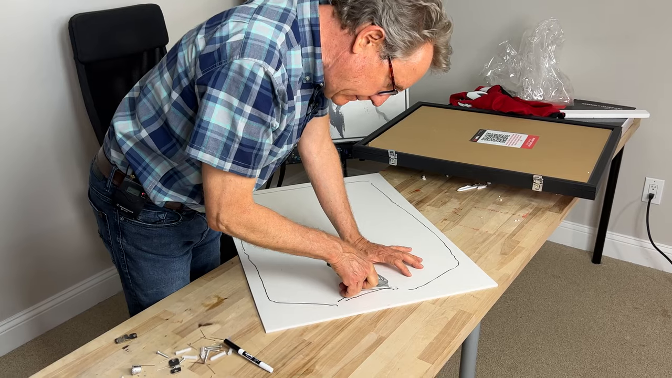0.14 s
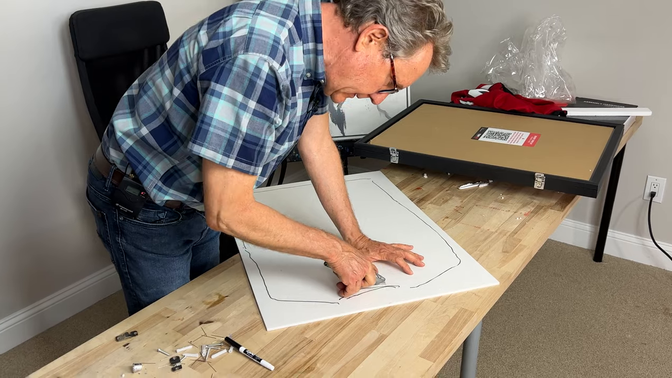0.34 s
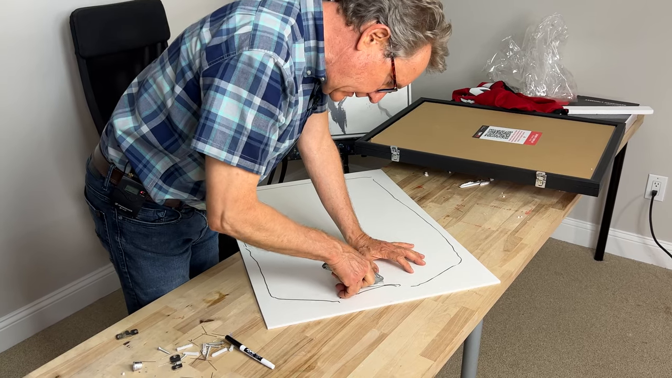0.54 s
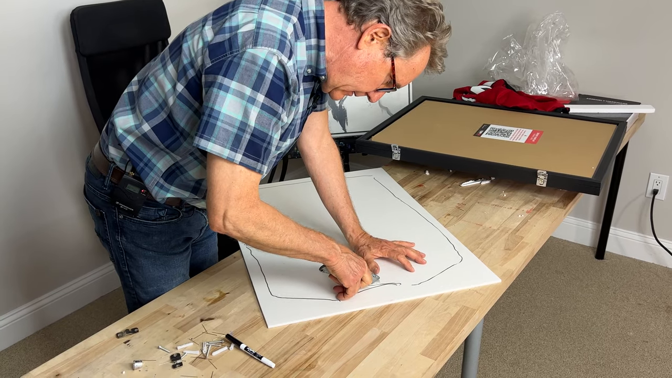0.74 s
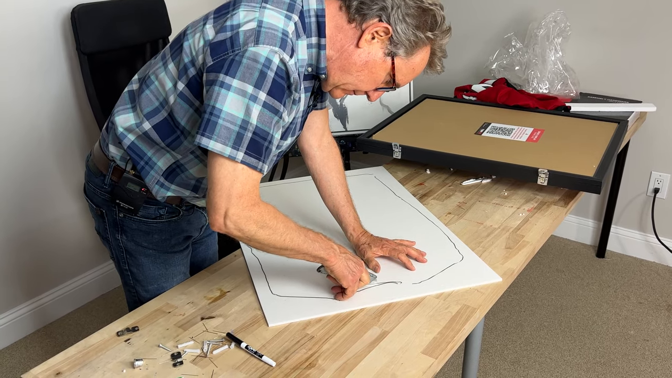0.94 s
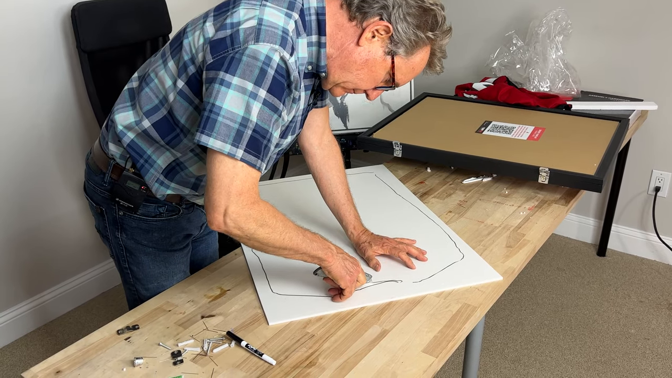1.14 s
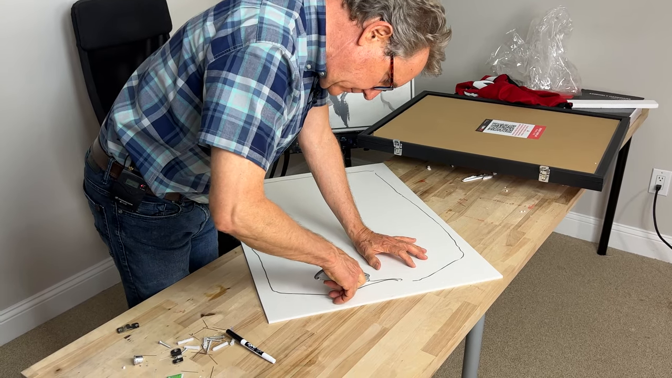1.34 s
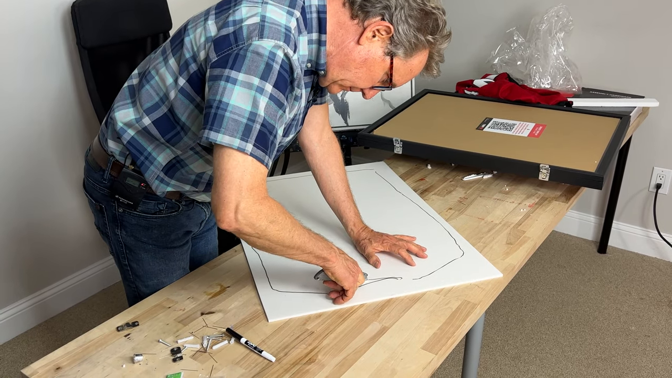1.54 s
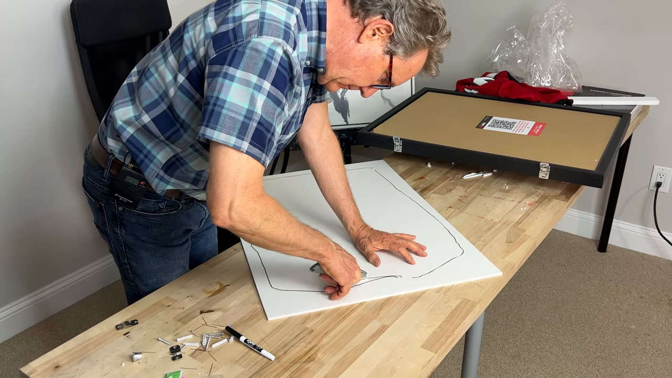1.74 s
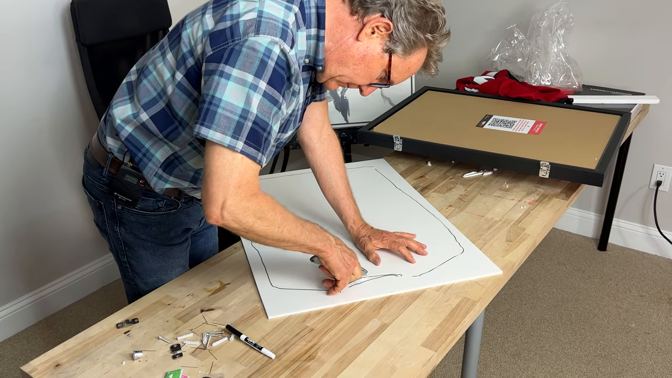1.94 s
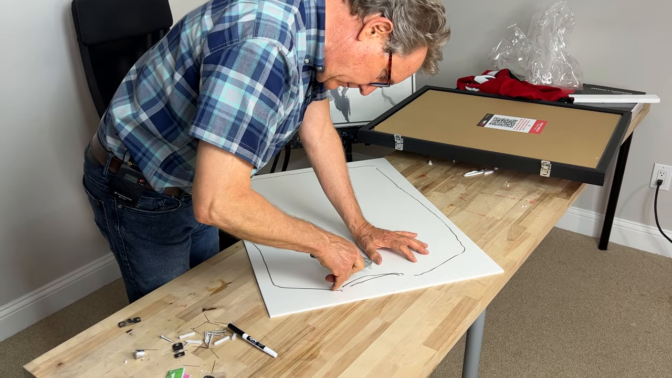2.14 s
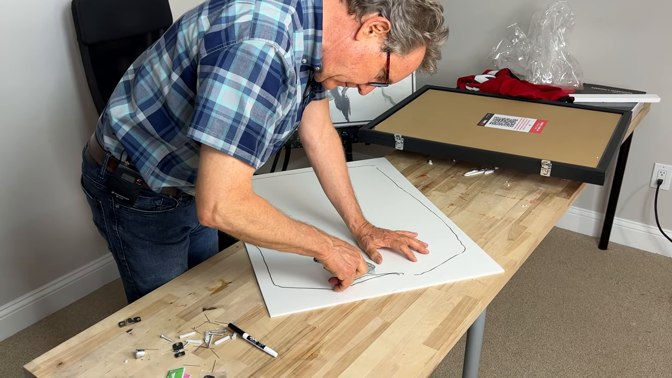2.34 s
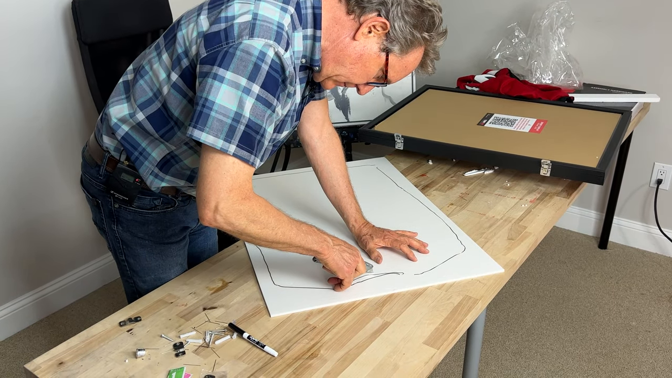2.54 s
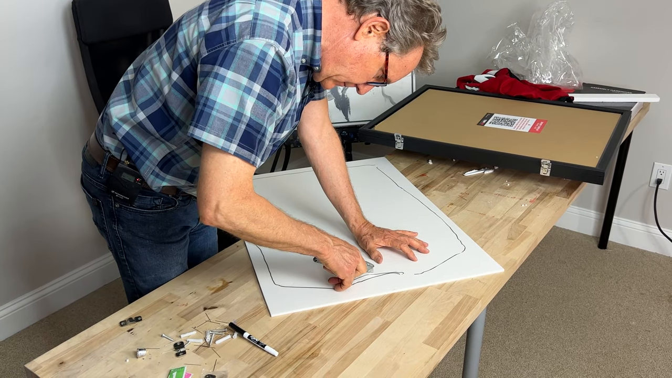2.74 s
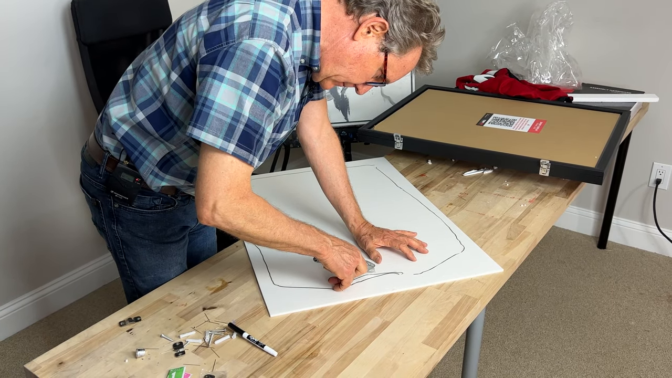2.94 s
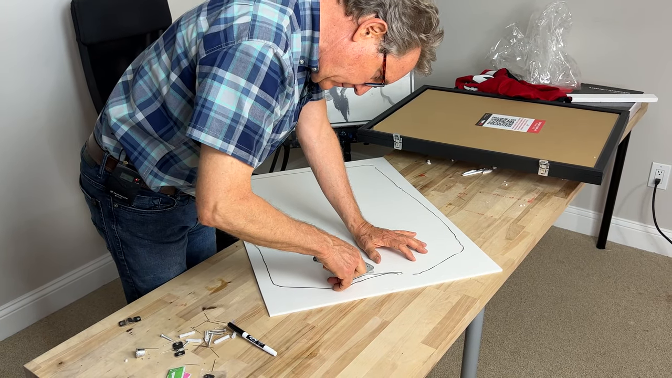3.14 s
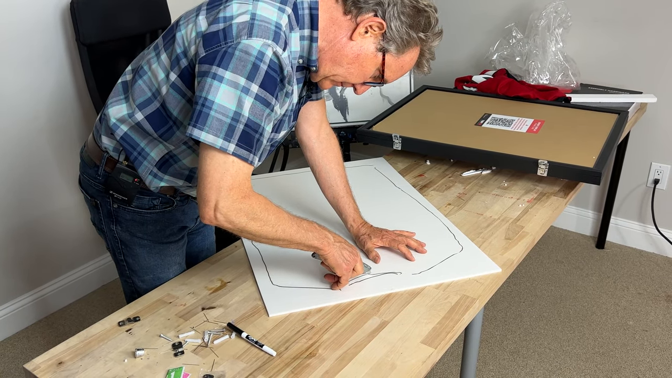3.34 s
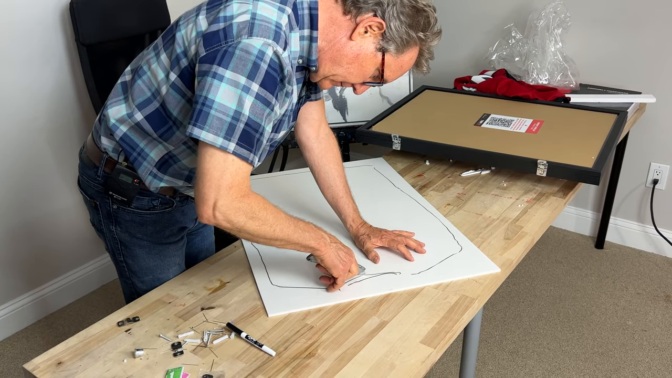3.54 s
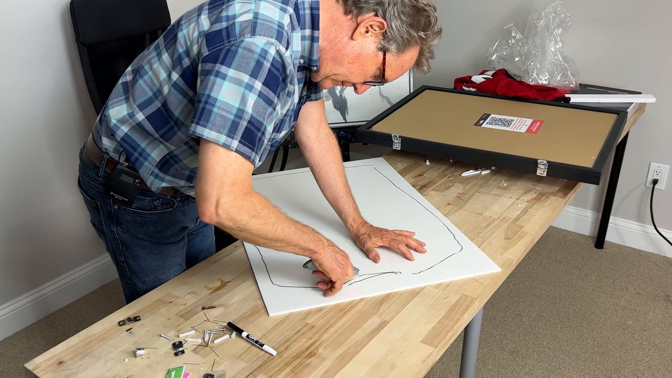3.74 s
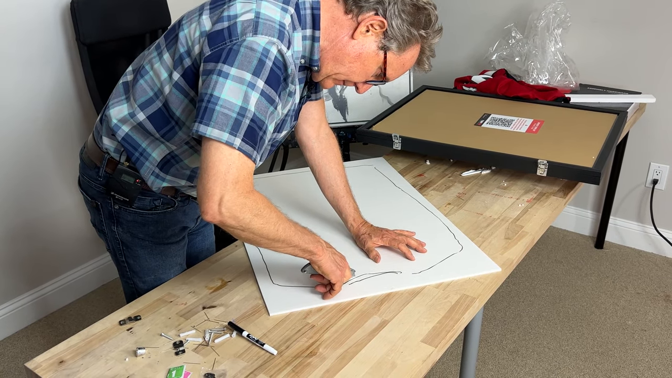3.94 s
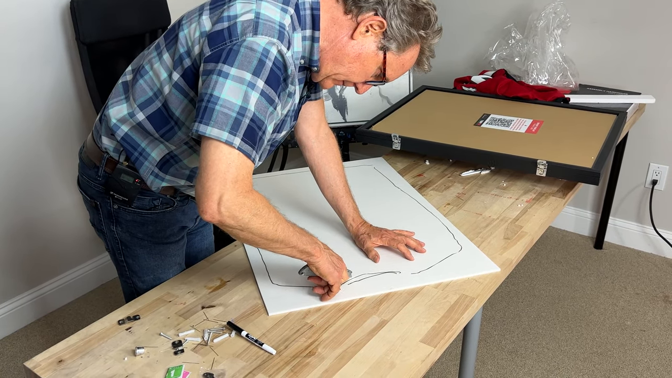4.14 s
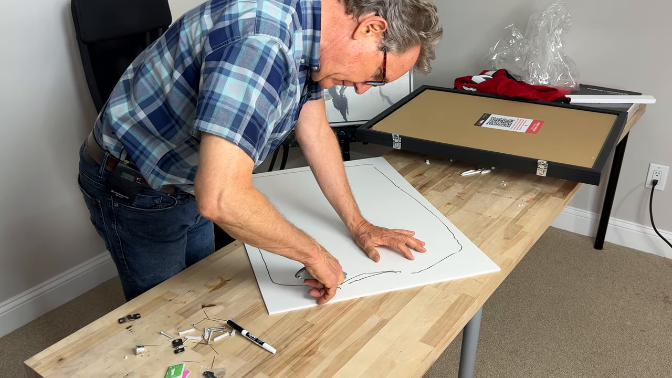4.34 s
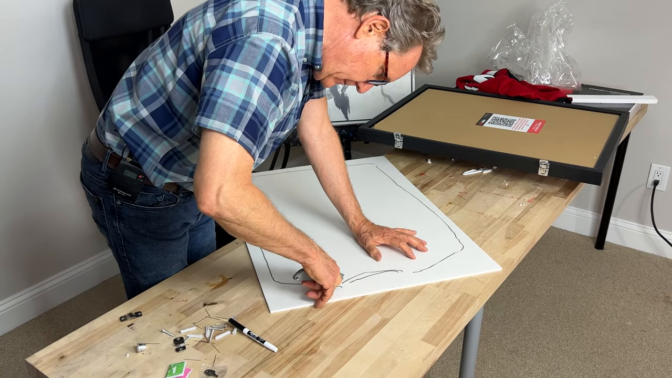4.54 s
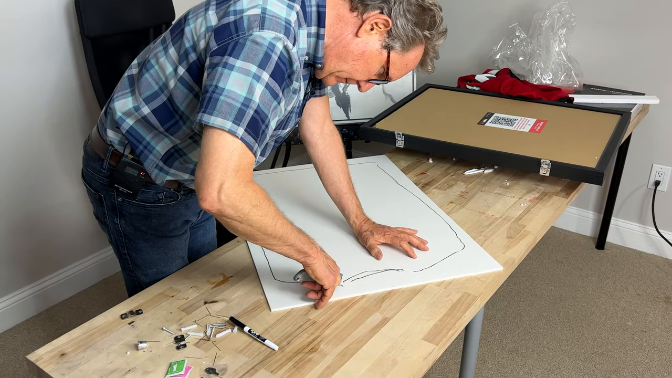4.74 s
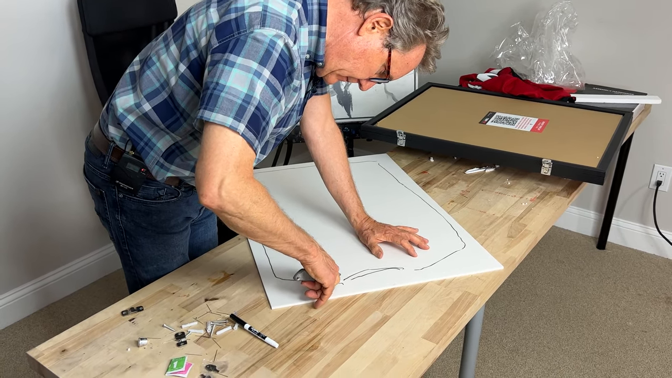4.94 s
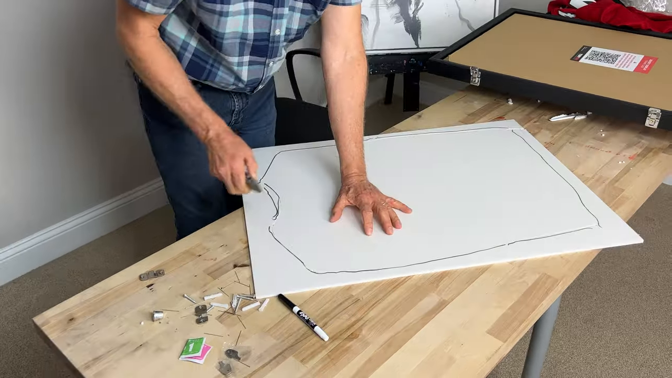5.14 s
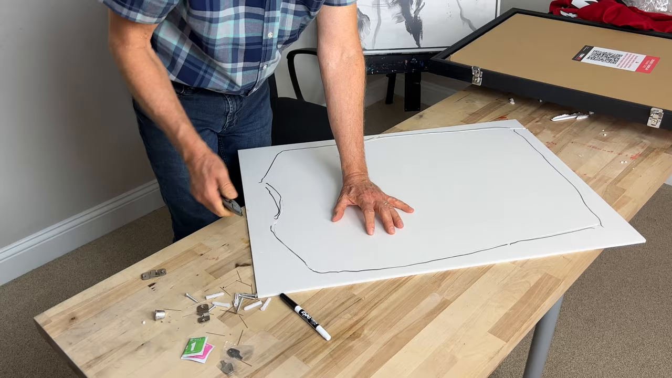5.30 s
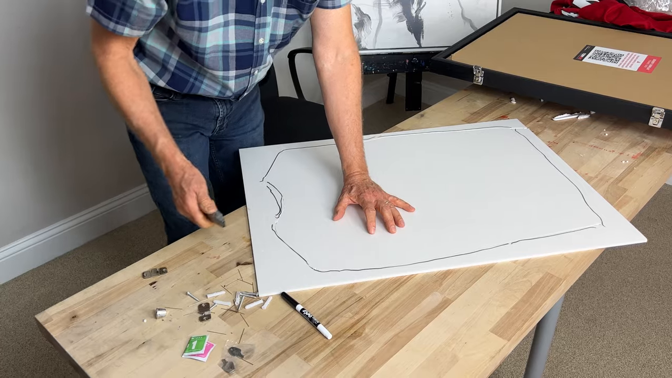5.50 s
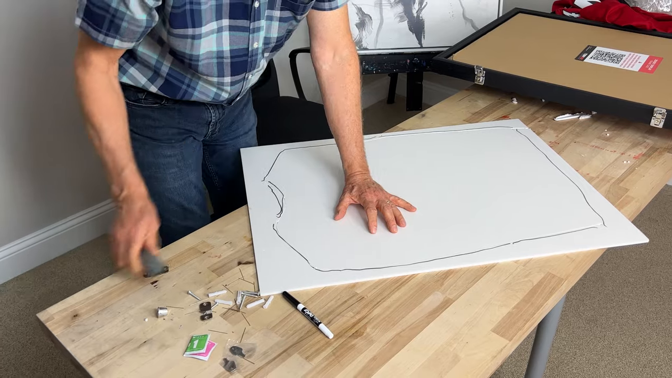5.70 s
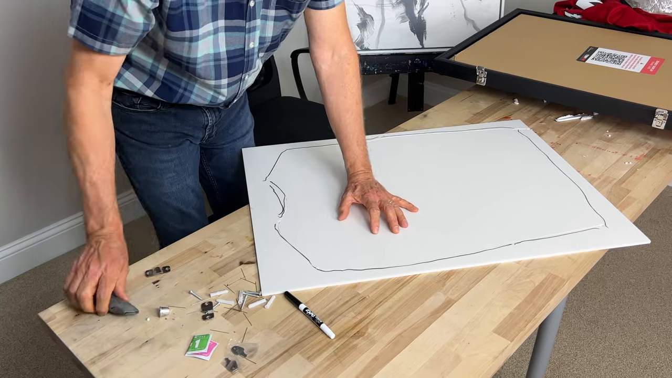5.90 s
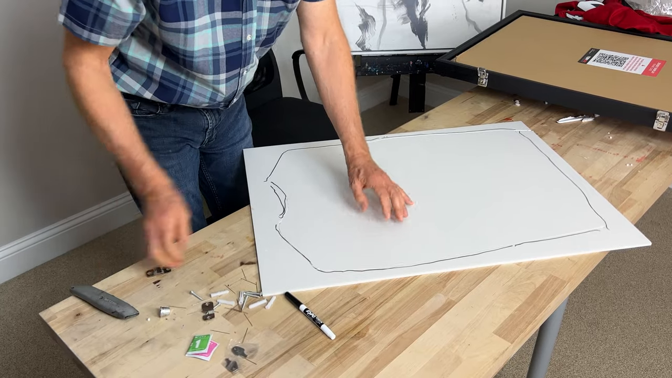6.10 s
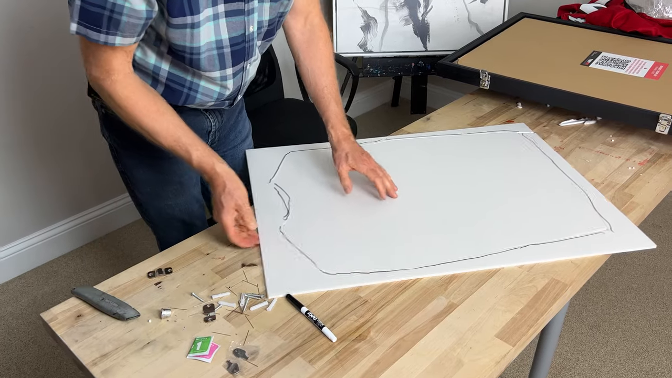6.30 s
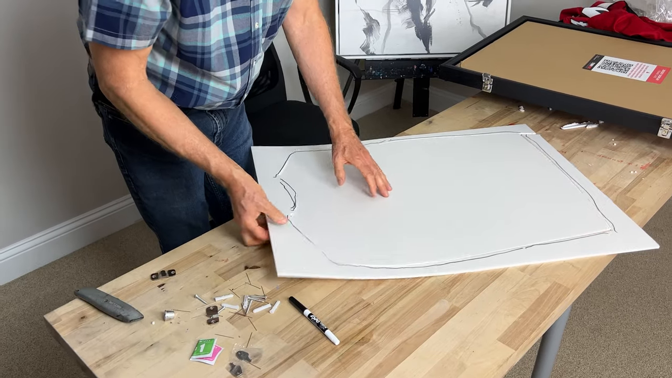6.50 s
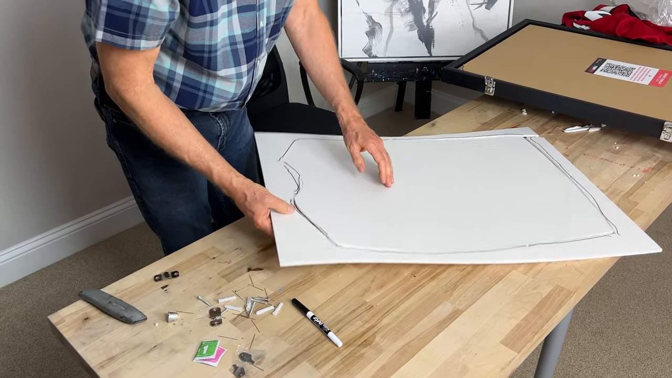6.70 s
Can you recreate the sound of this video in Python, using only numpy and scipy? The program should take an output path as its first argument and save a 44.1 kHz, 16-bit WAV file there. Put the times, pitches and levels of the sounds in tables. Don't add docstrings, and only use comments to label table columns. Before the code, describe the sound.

A utility knife hisses and drags through foam board in uneven strokes, then clatters onto a wooden bench before the board is lifted with scrapes.

```python
import sys
import numpy as np
from scipy import signal
from scipy.fft import rfft, irfft, next_fast_len
from scipy.io import wavfile
from scipy.ndimage import uniform_filter1d

SR = 44100
rng = np.random.default_rng(int(sys.argv[2]) if len(sys.argv) > 2 else 0)


def unload_wav(signal):
    wavfile.write(
        sys.argv[1],
        SR,
        np.round(np.clip(np.atleast_2d(signal).T, -1, 1) * 32767).astype(np.int16),
    )


def level_to_linear(level):
    exponent = np.asarray(level, float) / 20
    return 10 ** exponent


N = 302526

# freq_hz, level_db
BOARD_SPECTRUM = [(35, -24), (60, -25.5), (135, -3), (380, 0), (755, -4.5), (818, -4.5), (887, -12),
                  (1500, -20.5), (1950, -75), (3300, -120)]


def rms_one(x):
    return x / np.sqrt(np.mean(x ** 2) + 1e-20)


def add(out, at_s, x):
    i = round(at_s * SR)
    out[i:i + len(x)] += x[:N - i]


def in_time(rows):
    s, *columns = np.transpose(rows)
    t = np.arange(N) / SR
    is_open = 1. * ((t >= s[0]) & (t <= s[-1]))
    gate = uniform_filter1d(is_open, size=200, mode="nearest")
    return gate, [np.interp(t, s, c) for c in columns]


def coloured(x, spectrum):
    size = next_fast_len(N)
    hz = np.maximum(np.arange(size // 2 + 1) * SR / size, 1)
    points_hz, points_db = np.transpose(spectrum)
    gain = level_to_linear(np.interp(np.log(hz), np.log(points_hz), points_db))
    return rms_one(irfft(rfft(x, size) * gain, size)[:N])


def drift(rate_hz, size=N):
    r = np.exp(-2 * np.pi * rate_hz * 40 / SR)
    noise = rng.standard_normal(N // 40 + 2002)
    slow = signal.lfilter([1], [1, -2 * r, r * r], noise)[2000:]
    return np.interp(np.arange(size) / 40, np.arange(len(slow)), rms_one(slow))


def grains(per_s, spread_db, size=N):
    heights = level_to_linear(spread_db * np.minimum(rng.exponential(1, size), 4))
    heights = heights * rng.choice([-1, 1], size)
    return rms_one(heights * (rng.random(size) < per_s / SR))


def resonance(x, hz, width_hz):
    r = np.exp(-np.pi * width_hz / SR)
    poles = [1, -2 * r * np.cos(2 * np.pi * hz / SR), r * r]
    return signal.lfilter([(1 - r * r) / 2, 0, (r * r - 1) / 2], poles, x)


def ring(x, modes):
    total = 0
    for k, (hz, db, t60_s) in enumerate(modes):
        width_hz = np.log(1000) / np.pi / t60_s
        total = total + (-1) ** k * level_to_linear(db) * resonance(x, hz, width_hz)
    return rms_one(total)


def wavering(x, peaks, widen, waver_db, rate_hz):
    total = 0
    for hz, width_hz, db in peaks:
        gain = level_to_linear(db + waver_db * drift(rate_hz, size=len(x)))
        total = total + gain * resonance(x, hz, widen * width_hz + 30)
    return rms_one(total)


def plate(x, spacing_hz, depth_db, rate_hz, count):
    size, out = next_fast_len(N), 0
    spectrum, hz = rfft(x, size), np.arange(size // 2 + 1) * SR / size
    weights = (0.8 + np.tanh([drift(rate_hz) for k in range(count)])) ** 2
    for weight in weights / np.sqrt((weights ** 2).sum(axis=0)):
        ripple = np.interp(hz / spacing_hz, np.arange(2000), rng.standard_normal(2000))
        response = np.exp((depth_db * np.log(10) / 20 + 3j) * ripple)
        out = out + weight * irfft(spectrum * response, size)[:N]
    return rms_one(out)


def puff(length_s, fall_s):
    t = np.arange(int((length_s + 8 * fall_s) * SR)) / SR
    return np.minimum(t / (0.059 * length_s), 1) * np.exp(-np.maximum(t - length_s, 0) / fall_s)


def contacts(events, fall_s, sharp, broad_db, knock_sharp=3.9):
    out = np.zeros(N)
    for s, db, hz, length_s, board_db, board_hz in events:
        shape = puff(length_s, fall_s)
        noise = grains(8000, 2.8, size=6000)[:len(shape)]
        broad = level_to_linear(broad_db) * rms_one(resonance(noise, 4000, 4500))
        bright = broad + rms_one(resonance(resonance(noise, hz, hz / sharp), hz, hz))
        push = np.pad(shape * noise, (0, 900))
        knock = resonance(push, board_hz, board_hz / knock_sharp)
        knock += 0.55 * resonance(push, 0.34 * board_hz, board_hz / 2.0)
        add(out, s, level_to_linear(db - 17.5) * shape * bright)
        add(out, s, level_to_linear(db + board_db) * knock / np.abs(knock).max())
    return out


def pushes(rows, rounding):
    edge_db = 12
    t, hiss, board = np.linspace(0, N / SR, N // 20), 0, 0
    for s, rise_s, fall_s, db, bite_db in rows:
        away = np.where(t < s, (s - t) / rise_s, (t - s) / fall_s)
        power = level_to_linear(db - edge_db * np.minimum(away, 8) ** rounding) ** 2
        hiss, board = hiss + power, board + power * level_to_linear(bite_db) ** 2
    return np.array([np.interp(np.arange(N) / SR, t, power) for power in (hiss, board)])


def hand_gains():
    # peak_s, rise_s, fall_s, hiss_db, bite_db
    first_cut = [(0.02, 0.07, 0.067, -47, 2.5), (.15, 0.067, 0.14, -49, 0), (.29, 0.038, 0.16, -49.5, 3.5),
                 (.41, 0.027, 0.074, -53.5, 8.5), (.47, 0.037, 0.076, -53, 4.5),
                 (.555, 0.016, 0.095, -64.5, 11), (.61, 0.24, 0.26, -57.5, -18),
                 (.73, 0.058, 0.11, -47.5, -0.5), (.84, 0.12, 0.26, -53, 0),
                 (1.005, 0.053, 0.13, -50.5, 2.5), (1.09, 0.06, 0.23, -54, 4.5),
                 (1.33, 0.23, 0.069, -56, -2.5), (1.5, 0.13, 0.097, -54.5, -3),
                 (1.72, 0.11, 0.053, -58, -6), (1.87, 0.31, 0.12, -56, -37)]
    second_cut = [(3.4, 0.057, 0.05, -59, -13), (3.48, 0.092, 0.067, -55, 2), (3.65, .12, 0.16, -48.5, 5),
                  (3.9, 0.16, 0.15, -51.5, 1), (4.1, 0.066, 0.27, -58, -3), (4.33, 0.25, 0.24, -50, -2),
                  (4.56, 0.042, 0.095, -55, -3.5), (4.68, 0.046, 0.043, -62, 0),
                  (4.842, 0.13, 0.14, -52, -4.5), (5.11, 0.09, 0.27, -51.5, -9)]
    # peak_s, rise_s, fall_s, hiss_db
    skims = [(1.975, 0.021, 0.065, -59), (2.076, 0.027, 0.065, -48.5), (2.565, 0.0034, 0.11, -71),
             (2.85, 0.012, 0.016, -59.5), (2.9, 0.027, 0.02, -68), (3.165, 0.01, 0.026, -64),
             (3.25, 0.024, .03, -62), (3.208, 0.0099, 0.011, -45), (3.3, 0.11, 0.026, -59)]
    # from_s, to_s
    halts = [
        (1.58, 1.652),
        (1.938, 1.966),
        (4.932, 5.012),
    ]
    skim_bite_db, halt_db, cut_ends_s = -14, -12, 5.146
    power = pushes(first_cut + second_cut, 1.92)
    power = power + pushes([(*row, skim_bite_db) for row in skims], 1.2)
    t = np.arange(N) / SR
    halted = uniform_filter1d(1. * sum((t > start) & (t < end) for start, end in halts), size=600)
    return np.sqrt(power) * level_to_linear(halt_db * halted) * (t < cut_ends_s)


def cutting():
    # freq_hz, level_db
    hiss_spectrum = [(530, -32), (900, -10), (1510, -12.5), (1900, -8), (2660, -13.5), (2860, -9.5),
                     (4310, -7.5), (9650, -3.5), (13800, -9.5), (16000, -9.5)]
    stretch_starts = [0, .65, 1.62, 3.3, 3.56, 4.08, 4.98, 5.2]
    # freq_hz, width_hz, level_db
    blade_peaks = [
        [(1360, 51, -4), (1960, 62, 7), (2950, 170, 11), (4050, 72, 10), (6170, 230, 9.5), (6500, 200, 9.5),
         (9500, 140, 1), (11000, 200, -1)],
        [(1960, 68, -1), (3140, 320, 16), (2310, 200, -5), (5680, 230, 5), (6500, 320, 15), (8050, 310, 15.5),
         (9900, 78, 3), (11300, 120, 11), (13100, 140, -6)],
        [(3600, 150, 0.5), (2000, 150, -7), (5750, 320, -4), (6300, 77, -11), (8300, 270, 1)],
        [(4000, 150, 2), (5440, 300, -1), (8200, 290, -4), (9900, 430, 7)],
        [(1300, 180, -5), (1830, 53, 10), (4000, 44, -9), (5100, 120, 0), (8500, 150, -5), (9000, 130, -18),
         (9470, 190, 7.5)],
        [(3970, 100, 1), (4810, 27, 11), (5440, 180, -6), (1150, 170, 3), (8550, 180, -14), (9570, 170, 16),
         (12300, 89, 7)],
        [(1460, 38, 12.5), (7800, 150, 5), (9450, 210, 4.5), (10400, 300, -8)],
    ]
    cells = grains(14000, 4.6) * level_to_linear(1.16 * drift(74))
    blade = np.zeros(N)
    for start_s, end_s, peaks in zip(stretch_starts, stretch_starts[1:], blade_peaks):
        stretch = cells[round(start_s * SR):round(end_s * SR)]
        add(blade, start_s, wavering(stretch, peaks, 2.6, 2.5, 4.0))
    even = coloured(cells, hiss_spectrum)
    hiss = plate(even, 200, 1.2, 4.0, count=4)
    hiss = rms_one(hiss + np.roll(even, SR // 3) + level_to_linear(-3) * np.roll(blade, SR // 100))
    board_cells = grains(1500, 1.7) * level_to_linear(1.4 * drift(45))
    board = plate(coloured(board_cells, BOARD_SPECTRUM), 35, 1.8, 7.0, count=4)
    hiss_gain, board_gain = hand_gains()
    return hiss_gain * hiss + board_gain * board


def board_contacts():
    # start_s, peak_db, colour_hz, board_share_db, board_hz
    tick_rows = [(0.4052, -33.5, 7330, -7, 326), (1.452, -51, 8450, -16, 483), (1.907, -41, 4800, -19, 396),
                 (1.969, -42, 8200, -30, 425), (2.031, -46, 9570, -12, 867), (2.568, -50, 4850, -13, 837),
                 (2.721, -54, 9650, -21, 385), (2.748, -52, 2000, -28, 472), (2.849, -52, 9220, -30, 318),
                 (3.086, -54, 3540, -19, 300), (3.12, -57, 4850, -19, 301), (3.171, -49, 4500, -2, 1100),
                 (3.251, -59, 4000, -10, 1000), (3.157, -50, 4600, 2, 1700), (3.1963, -41, 3560, -7, 1300),
                 (3.3675, -46.5, 3500, -2.5, 686), (4.775, -48, 7000, -20, 400),
                 (4.0603, -33, 7740, -7, 310), (4.688, -41, 9450, -21, 301)]
    # start_s, peak_db, colour_hz, length_s, board_share_db
    scuff_rows = [
        (2.0603, -28.5, 5130, 0.014, -7.5),
        (2.073, -25, 5300, 0.011, -23),
        (2.628, -57, 6550, 0.026, -15),
        (3.2036, -53, 8050, 0.018, 3.5),
        (3.284, -42.5, 8300, 0.036, -25),
    ]
    # start_s, peak_db, length_s, board_share_db, board_hz
    edge_rows = [
        (6.4412, -41.5, 0.0032, 6.5, 566),
        (6.47, -29.5, 0.014, -2, 1740),
        (6.521, -40.5, 0.017, 7, 1500),
        (6.584, -38, 0.023, 6, 1850),
        (6.603, -26, 0.0063, -3, 1970),
        (6.7053, -29.5, 0.018, -0.5, 2360),
        (6.732, -36, 0.0054, 3, 1990),
        (6.76, -42, 0.02, 7, 2230),
                 (6.79, -48, .064, 10, 2170),
    ]
    tick_s, scuff_board_hz, edge_hz = 0.0029, 910, 7300
    tick_events = [(s, db, hz, tick_s, share, low) for s, db, hz, share, low in tick_rows]
    scuff_events = [(*row, scuff_board_hz) for row in scuff_rows]
    edge_events = [(s, db, edge_hz, *rest) for s, db, *rest in edge_rows]
    ticks = contacts(tick_events, 0.0013, 5.2, 1.7)
    scuffs = contacts(scuff_events, 0.0049, 1.5, -2.0)
    return ticks + scuffs + contacts(edge_events, 0.004, 2.2, 2.5, 6.5)


def damped_swings(rows, rise_s):
    out, t = np.zeros(N), np.arange(SR // 10) / SR
    for s, db, hz, cycles in rows:
        swing = np.sin(2 * np.pi * hz * t) * np.exp(-2.5 * t * hz / cycles)
        add(out, s, level_to_linear(db + 3.0) * swing * np.minimum(t / rise_s, 1))
    return out


def board_swings():
    # start_s, peak_db, freq_hz, cycles
    flap_rows = [(5.145, -36.5, 75, 3), (5.165, -21.5, 90.5, 0.36), (5.175, -34, 76, 5.2),
                 (5.205, -26, 96.3, 4.1), (5.251, -40, 74, 2.8), (5.288, -37, 72, 3.7),
                 (5.338, -36.5, 71.6, 2.8), (5.364, -34, 67.6, 2.2), (5.429, -44, 70.4, 1.9),
                 (5.453, -45, 64.6, 2.5), (6.441, -32, 115, 1.3), (6.608, -37, 118, 4.4),
                 (6.73, -40, 104, 2.5), (6.788, -40, 73, 1.3), (6.816, -33.5, 96, 6.8),
                 (6.843, -29.5, 116, 11)]
    # start_s, peak_db, freq_hz, cycles
    knock_rows = [(1.482, -53, 563, 8), (1.503, -44, 620, 8), (1.53, -54, 600, 8), (3.161, -60, 1710, 14),
                  (3.209, -47, 1016, 14), (3.357, -52, 248, 2.5), (6.424, -44, 495, 6),
                  (6.442, -31.5, 463, 5.2), (6.442, -36.5, 1000, 7.7), (6.456, -50, 473, 4.6),
                  (6.472, -36, 2720, 25), (6.475, -50, 513, 6), (6.475, -46, 1480, 13),
                  (6.527, -39, 1280, 16), (6.529, -41, 1640, 13), (6.539, -41, 1250, 19),
                  (6.585, -39, 1810, 14), (6.585, -42, 935, 5.4), (6.594, -45, 2070, 12),
                  (6.604, -35, 1080, 14), (6.605, -28, 1960, 27), (6.609, -30, 2000, 20),
                  (6.607, -34, 4040, 25), (6.705, -36, 804, 4.8), (6.708, -35, 2580, 18),
                  (6.71, -40, 1700, 14), (6.712, -40, 764, 10), (6.716, -34, 3600, 25),
                  (6.719, -39, 2000, 31), (6.719, -38, 2400, 20), (6.735, -47, 2030, 12),
                  (6.764, -48, 600, 7), (6.769, -40, 2330, 18), (6.771, -40, 1040, 9),
                  (6.774, -41.5, 620, 8.1)]
    return damped_swings(flap_rows, 0.0028) + damped_swings(knock_rows, 0.0018)


def tap():
    # freq_hz, level_db, t60_s
    tap_modes = [(330, -5, .035), (500, -2, .03), (690, -1, .035), (2500, -9, .01), (4000, -3, .025),
                 (6300, 2, .01)]
    tap_s, peak_db = 2.3878, -38.5
    click = np.zeros(N) + 1e-18
    click[round(tap_s * SR)] = 1
    click = signal.sosfilt(signal.butter(2, 1600, fs=SR, output="sos"), click)
    knock = ring(click, [(hz, db + 20 * np.log10(t60_s), t60_s) for hz, db, t60_s in tap_modes])
    return level_to_linear(peak_db) * knock / np.abs(knock).max()


def slider():
    # start_s, peak_db, colour_hz, length_s
    click_rows = [(5.4054, -20.5, 4650, 0.00073), (5.412, -36, 5750, 0.0038), (5.4503, -31, 3430, 0.0011),
                  (5.468, -28, 4810, 0.0011), (5.499, -35.5, 2800, 0.0035), (5.59, -48, 2280, 0.0096),
                  (5.667, -24.5, 3370, 0.0032), (6.191, -33, 11000, 0.0012), (6.203, -32, 6160, 0.002),
                  (6.229, -26.5, 9000, 0.00095), (5.186, -55, 4500, .002)]
    # freq_hz, level_db, t60_s
    shell_modes = [(1900, -2, .09), (3600, -1, .06), (5600, -5, .04)]
    shell_share_db, shell_hz = -18, 2070
    clicks = contacts([(*row, shell_share_db, shell_hz) for row in click_rows], 0.0011, 1.0, -2.0)
    return clicks + level_to_linear(-86) * ring(clicks + 1e-18, shell_modes)


def handle_noises():
    # time_s, level_db
    hush_curves = [
        [(5.15, -57.5), (5.18, -70), (5.21, -80), (5.225, -67), (5.26, -75.5), (5.4, -71)],
        [(5.4, -63.5), (5.462, -70), (5.588, -65.5), (5.665, -71)],
        [(5.675, -72.5), (5.9, -65)],
    ]
    # time_s, pitch_hz, level_db
    squeak_curve = [(5.7, 8600, -82), (5.73, 9200, -77), (5.76, 9700, -75), (5.79, 9900, -74),
                    (5.82, 9780, -74), (5.85, 9850, -74), (5.88, 9550, -76), (5.9, 9200, -80)]
    # ratio, level_db
    squeak_partials = [(.55, -7), (.72, -2), (.83, -6), (.93, -4), (1.001, -2), (1.045, -3)]
    # time_s, pitch_hz, level_db
    top_curve = [(5.77, 15700, -90), (5.79, 15700, -80), (5.82, 15300, -78), (5.845, 15550, -77),
                 (5.875, 15300, -76), (5.9, 14750, -74)]
    rustle_spectrum = [(700, 13.0), (1200, -1.0), (2000, 2.5), (3500, 8.0), (5000, 4.0), (11000, 1.0),
                       (16000, -7)]
    rustle = coloured(rng.standard_normal(N), rustle_spectrum)
    rustle, out = plate(rustle, 200, 3.0, 4.0, count=3), 0
    for rows in hush_curves:
        gate, (hush_db,) = in_time(rows)
        out = out + gate * level_to_linear(hush_db) * rustle
    for rows, partials in (squeak_curve, squeak_partials), (top_curve, [(1, 2)]):
        gate, (hz, db) = in_time(rows)
        phase = 2 * np.pi * np.cumsum(hz) / SR
        for ratio, partial_db in partials:
            gain = gate * level_to_linear(db + partial_db + 3 + 3 * drift(12))
            out = out + gain * np.sin(ratio * phase + .5 * drift(40))
    return out


def dying(starts_s, levels_db, loss_db_per_s):
    rocking_ends_s = 6.325
    t, power = np.arange(N) / SR, 0
    for s, db in zip(starts_s, levels_db):
        power = power + (t >= s) * level_to_linear(db - loss_db_per_s * np.maximum(t - s, 0)) ** 2
    return uniform_filter1d(np.sqrt(power) * (t < rocking_ends_s), size=200)


def knife_down():
    # start_s, peak_db, contact_s, bench_share_db, metal_share_db
    landings = [
        (5.906, -12, 0.0011, -2, -3),
        (5.94, -13.5, 0.0016, -26, 10),
        (5.962, -26.5, 0.0054, -10, 0),
        (6.015, -33.5, 0.0078, -12, -11),
        (6.042, -46, 0.005, 20, -16),
        (6.081, -40.5, 0.0015, -14, -8),
        (6.1158, -20.5, 0.0011, -5, -22),
        (6.126, -32, 0.002, 0, -12.5),
    ]
    # start_s, bench_db, handle_db, hiss_db
    rocking_rows = [
        (5.908, -36.5, -38.5, -48.5),
        (5.937, -34.5, -29, -38),
        (6.029, -33.5, -46, -54),
        (6.054, -58, -60, -50),
        (6.12, -38.5, -33.5, -47.5),
        (6.232, -64, -54, -49.5),
    ]
    # freq_hz, level_db, t60_s
    bench_modes = [(130.7, 3.5, 0.11), (240, -5, 0.069), (310, -3, 0.092), (368, 1.5, 0.12),
                   (494, -9, 0.049)]
    handle_modes = [(690, 9.1, 0.011), (876, 16.1, 0.066), (1040, 3.7, 0.016), (1280, 6.1, 0.033),
                    (1464, 3.6, 0.033), (1750, 1, 0.13), (2450, 2.8, 0.13)]
    metal_modes = [(3430, 2, 0.0036), (4780, 10.5, 0.02), (5600, 7, 0.018), (7700, -21, 0.022),
                   (11200, -32, 0.015)]
    bench_loss, handle_loss, hiss_loss = 117, 300, 141
    hiss_spectrum = [(900, 6.5), (2000, -5.5), (6000, 0.0), (11000, -6), (12500, -15),
                     (16000, -20)]
    heavy, middle, sharp = np.zeros((3, N)) + 1e-18
    for s, db, contact_s, bench_db, metal_db in landings:
        shape = puff(contact_s, 0.0041)
        hit = level_to_linear(db) * shape * grains(9000, 1.5, size=2000)[:len(shape)]
        add(heavy, s, level_to_linear(bench_db) * hit)
        add(middle, s, hit)
        add(sharp, s, level_to_linear(metal_db) * hit)
    handle_body = rms_one(resonance(resonance(middle, 1200, 1550), 1200, 1900))
    handle = ring(middle, handle_modes) + level_to_linear(-3.5) * handle_body
    metal = ring(sharp, metal_modes) + level_to_linear(-37) * rms_one(resonance(sharp, 4400, 7400))
    s, bench_db, handle_db, hiss_db = np.transpose(rocking_rows)
    chatter = signal.lfilter([1], [1, -1.7, .72], grains(450, 1.4))
    rocking = dying(s, bench_db, bench_loss) * ring(chatter, bench_modes)
    rocking += dying(s, handle_db - 5.5, handle_loss) * ring(chatter, handle_modes)
    rocking += dying(s, hiss_db, hiss_loss) * coloured(grains(14000, 2.6), hiss_spectrum)
    return level_to_linear(-64.5) * ring(heavy, bench_modes) + level_to_linear(-51.5) * handle + level_to_linear(-54.0) * metal + rocking


def rattle():
    # start_s, low_pair_db, middle_pair_db, high_pair_db
    bounces = [(5.921, -46, -40, -44), (5.939, -24, -25, -15.5), (5.947, -40, -33, -27),
               (5.960, -25, -26, -27), (5.982, -32, -35.5, -30.5), (5.998, -35, -48, -43),
               (6.016, -47, -28.5, -34), (6.026, -26, -39, -43), (6.042, -26, -48, -34),
               (6.054, -50, -50, -38), (6.064, -32, -53, -52), (6.075, -39, -29.5, -30),
               (6.087, -35.5, -50, -44), (6.112, -35, -39, -51), (6.128, -33, -38, -32.5),
               (6.147, -36, -37, -50), (6.156, -47, -40, -38), (6.172, -42, -46, -41),
               (6.184, -44, -57, -49), (6.203, -45, -49, -55), (6.22, -46, -48, -48)]
    # freq_hz, t60_s
    mode_pairs = [
        [(290, 0.065), (330, 0.034)],
        [(660, 0.041), (710, 0.034)],
        [(1035, 0.054), (1085, 0.039)],
    ]
    out, t = np.zeros(N), np.arange(SR // 8) / SR
    for s, *levels_db in bounces:
        for db, pair in zip(levels_db, mode_pairs):
            rings = sum(np.sin(2 * np.pi * hz * t) * level_to_linear(-60 * t / t60_s) for hz, t60_s in pair)
            add(out, s, level_to_linear(db - 3) * rings * np.minimum(t / 0.002, 1))
    return out


def lifting():
    # time_s, rub_db, board_db
    lift_curves = [
        [(6.32, -74, -84), (6.334, -42, -53), (6.372, -41.5, -56), (6.465, -46.5, -48)],
        [(6.465, -54, -45), (6.537, -52.5, -62), (6.707, -48.5, -62.5), (6.86, -51.5, -53.5)],
    ]
    # freq_hz, level_db
    rub_spectrum = [(530, -38), (900, -8), (1490, 0.5), (2500, -5.5), (3550, 2), (4310, 0), (5550, 5.5),
                    (8150, 3.5), (12900, -0.5), (16000, -14)]
    skin = grains(12000, 1.6) * level_to_linear(2.0 * drift(32))
    rub = plate(coloured(skin, rub_spectrum), 200, 2.0, 6.0, count=4)
    board, out = coloured(skin, BOARD_SPECTRUM), 0
    for rows in lift_curves:
        gate, (rub_db, board_db) = in_time(rows)
        out = out + gate * (level_to_linear(rub_db) * rub + level_to_linear(board_db) * board)
    return out


def room(x):
    t60_s, wall_cut_hz = 0.37, 4100
    size = next_fast_len(N + SR)
    w = 2 * np.pi * np.arange(size // 2 + 1) / size
    dull = 1 / (1 + 1j * w * SR / (2 * np.pi * wall_cut_hz))
    response = 0
    for k, lag in enumerate(rng.uniform(.006, .03, 10) * SR):
        loop = dull * level_to_linear(-60 * lag / SR / t60_s) * np.exp(-1j * w * lag)
        response = response + (-1) ** k * loop / (1 - loop)
    return irfft(rfft(x, size) * response, size)[:N]


def still_air():
    # freq_hz, level_db
    air_spectrum = [(12, -24), (20, -12), (58, -1), (116, 0.5), (163, -3.5), (485, -15), (542, -14.5),
                    (976, -20.5), (2260, -25), (2750, -28.5), (9950, -31), (14300, -36.5), (16000, -31)]
    air = level_to_linear(-65.5) * coloured(rng.standard_normal(N), air_spectrum)
    return signal.sosfilt(signal.butter(2, 14000, fs=SR, output="sos"), air)


def scene():
    knocks = board_contacts() + slider() + knife_down() + rattle()
    mix = cutting() + board_swings() + tap() + handle_noises() + lifting()
    mix = mix + knocks + level_to_linear(-17) * room(knocks) + still_air()
    return mix[None]


def top_cut(x):
    return signal.sosfilt(signal.butter(12, 16390, fs=SR, output="sos"), x)


def record(dry):
    rounded = .35 * np.tanh(dry / .35)
    low_pass = signal.ellip(12, .3, 60, 15720, fs=SR, output="sos")
    return top_cut(signal.sosfilt(low_pass, rounded))


dry = scene()
out = record(dry)
unload_wav(out)
```